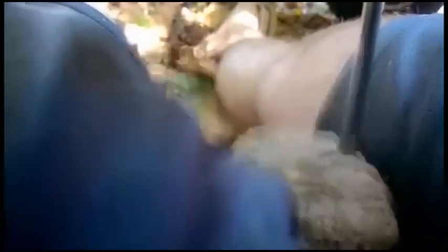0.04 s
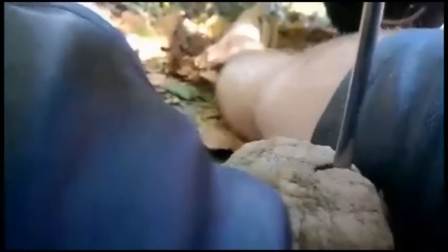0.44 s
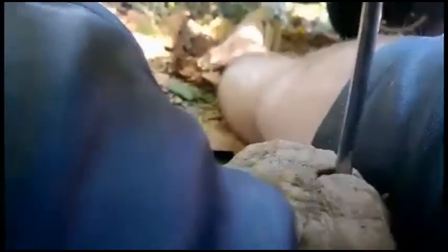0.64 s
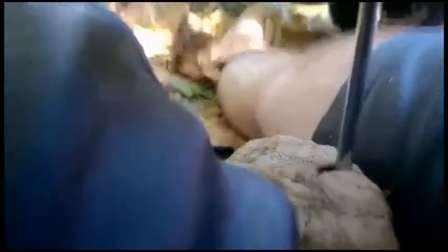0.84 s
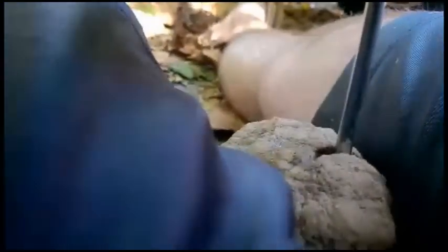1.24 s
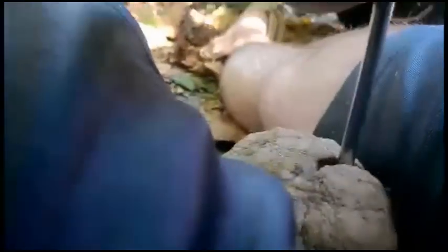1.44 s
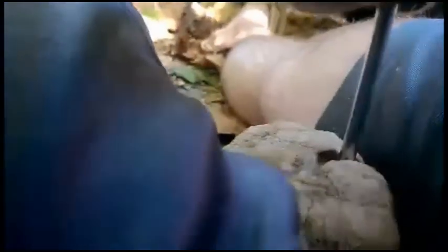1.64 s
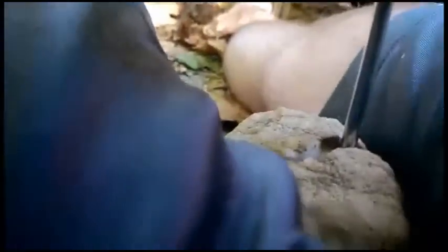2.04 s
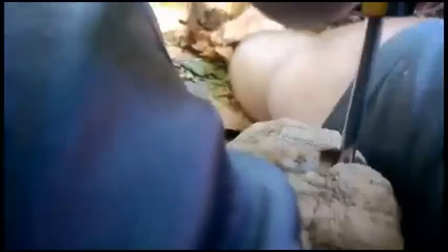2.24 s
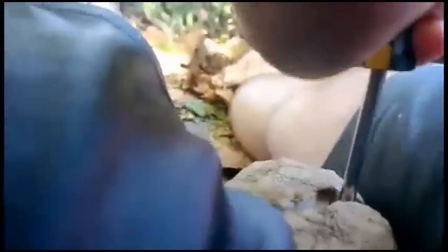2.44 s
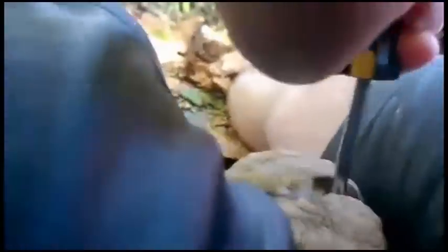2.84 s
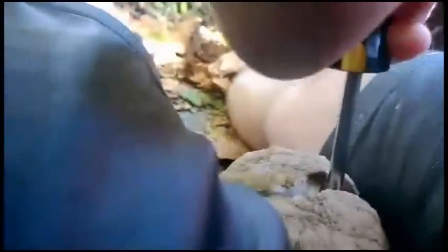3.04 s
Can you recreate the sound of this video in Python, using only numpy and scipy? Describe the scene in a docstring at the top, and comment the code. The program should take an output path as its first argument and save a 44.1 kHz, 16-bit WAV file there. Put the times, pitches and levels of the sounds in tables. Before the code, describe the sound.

Quick, even hammer blows drive a screwdriver into stone, clacking and thudding close to the microphone, the hardest slightly overloading it. The metal rings faintly and small chips tick, over quiet woodland air and a soft cricket.

```python
"""A hammer drives a screwdriver into a rock: twelve close blows, about four a second.
Each impact excites damped modes: the handle knocks, the rock clacks and thuds, the ground bumps low
and the steel rings faintly. Stone crushed under the tip gives a burst of noise, and the woods scatter
the crack back. A few chips tick, and a cricket chirps with its wings over quiet outdoor air.
The hardest blows overload the microphone."""
import sys
import numpy as np
from scipy import signal
from scipy.fft import rfft, irfft
from scipy.io import wavfile

SR = 44100
rng = np.random.default_rng(int(sys.argv[2]) if len(sys.argv) > 2 else 0)


def pcm_store(signal):
    """Save signal as 16-bit PCM."""
    levels = np.round(np.clip(np.atleast_2d(signal), -1, 1) * 32767)
    wavfile.write(sys.argv[1], SR, levels.astype(np.int16).T)


N = 136710


def amp(db):
    """Amplitude ratio of a level in decibels."""
    return 10 ** (np.asarray(db) / 20)


def unit(x):
    """Normalisation to rms 1."""
    return x / np.sqrt(np.mean(x ** 2) + 1e-20)


def read(points, hz):
    """Interpolation on a logarithmic frequency axis."""
    f, value = np.transpose(points)
    return np.interp(np.log(hz + 1), np.log(f + 1), value)


def add(mix, start, sound):
    """Superposition: a sound joins the mix at a start time in seconds."""
    part = mix[max(round(start * SR), 0):][:len(sound)]
    part += sound[:len(part)]


def noise(spectrum, size):
    """Spectral shaping: white noise takes on a relative spectrum (f/Hz, level/dB), at rms 1."""
    gain = amp(read(spectrum, np.fft.rfftfreq(size, 1 / SR)))
    return unit(irfft(rfft(rng.standard_normal(size)) * gain, size))


def envelope(t, rise, t60):
    """Exponential decay, 60 dB in t60 seconds, with a smooth onset of about rise seconds."""
    t = np.maximum(t, 0)
    return (1 - np.exp(-(t / rise) ** 2)) * np.exp(-np.log(1000) * t / t60)


def mode(t, hz, rise, t60):
    """Free vibration of a damped oscillator."""
    return envelope(t, rise, t60) * np.sin(2 * np.pi * hz * t)


def modes(t, table, rise):
    """Modal superposition: a body vibrates as the sum of its modes."""
    return sum(amp(db) * mode(t, hz, rise, t60) for hz, db, t60 in table)


def background():
    """Broadband noise of air and far insects, and a distant drone that wavers as narrow-band noise does."""
    # outdoor air with a band of insect hiss: f/Hz, relative level/dB
    air_spectrum = [(15, -25), (25, -3), (123, -2.5), (166, -16), (256, -16.5), (285, -13), (335, -17),
                    (463, -19.5), (887, -17.5), (1160, -24), (1260, -16), (2220, -31), (2410, -32),
                    (2990, -35.5), (4490, -37), (5570, -28.5), (7110, -26), (8360, -47.5), (16000, -44)]
    # bands of the low drone: f/Hz, level/dB, half-width/Hz
    drone_bands = [(111.9, -56, 16.4), (237.7, -64, 14.5), (350, -66, 16)]
    swell_db = noise([(0, 0), (6, 0), (20, -60), (100, -150)], N)
    out = amp(-51 + swell_db) * noise(air_spectrum, N)
    f = np.fft.rfftfreq(N, 1 / SR)
    for hz, db, width in drone_bands:
        band = rfft(rng.standard_normal(N)) / (1 + ((f - hz) / width) ** 2)
        out += amp(db) * unit(irfft(band, N))
    return out


def cricket():
    """Stridulation: five wing strokes to a chirp, each a pure tone that sags a little; the first is weak."""
    # chirps: t/s, level/dB
    chirps = [(.056, -53.5), (.464, -55.5), (0.887, -52), (1.318, -51.5), (1.742, -54.5), (2.178, -52.5),
              (2.62, -52)]
    pitch_hz, fall_hz, stroke_s, period_s = 5745, 82.4, 0.027, 0.0347
    progress = np.arange(0, stroke_s, 1 / SR) / stroke_s
    hz = pitch_hz + fall_hz * (0.5 - progress)
    stroke = np.sin(np.pi * progress) * np.sin(2 * np.pi * np.cumsum(hz) / SR)
    out = np.zeros(N)
    for start, db in chirps:
        for k, stroke_db in enumerate([-9, 0, 0, 0, 0]):
            add(out, start + k * period_s, amp(db + stroke_db) * stroke)
    return out


def handle_knock(t, hz):
    """Impulse response: the struck handle rings in one heavily damped mode."""
    return -mode(t, hz, rise=0.0004, t60=0.0065)


def rock_clack(t, hz):
    """Impact excitation: two short-lived modes of the rock make a clack."""
    # modes of the rock: frequency ratio, level/dB, T60/s
    rock_modes = [(1.002, 2.5, 0.0089), (1.148, -14, 0.02)]
    return -sum(amp(db) * mode(t, hz * ratio, rise=0.00072, t60=t60) for ratio, db, t60 in rock_modes)


def stone_grit(t, hz):
    """Brittle fracture: stone crushed under the tip gives a noise burst with a brief pitched bite."""
    # crushed stone: f/Hz, relative level/dB
    grit_spectrum = [(300, 7), (1400, -13.5), (2000, -6), (2700, -0.5), (3700, -4), (5200, -8.5),
                     (7000, -18.5), (16000, -28)]
    crunch = amp(7) * noise(grit_spectrum, len(t)) * envelope(t, rise=0.00075, t60=0.015)
    return crunch + amp(16.5) * mode(t, hz, rise=0.00075, t60=0.0054)


def overload_snap(t, hz):
    """Overload distortion: a treble fizz and a click stand for the clipping on the hard blows."""
    # overload fizz: f/Hz, relative level/dB
    fizz_spectrum = [(2000, -48), (5500, -11), (7500, 8), (9000, -14), (11000, -3.5), (13000, -13),
                     (14800, -2), (17000, -21)]
    fizz = amp(8.5) * noise(fizz_spectrum, len(t)) * envelope(t, rise=0.00058, t60=0.0045)
    return fizz + amp(15) * mode(t, hz, rise=0.00008, t60=0.0017)


def steel_ring(t, clink_db, ring_db):
    """Light damping lets the steel tools ring on; two modes close in frequency beat."""
    # clink of the tools: f/Hz, level/dB, T60/s
    clink_modes = [(954, -13, .2), (1494, -2, 0.36), (1803, -4.5, 0.26), (1850, 5.5, 0.24),
                   (3775, -8, 0.33), (4350, 7, 0.21), (4457, 14, 0.14)]
    # long, beating ring: f/Hz, level/dB, T60/s
    close_pair = [(6389, 8, 0.44), (6399, -2, 0.63)]
    clink = amp(clink_db) * modes(t, clink_modes, rise=0.016)
    return clink + amp(ring_db) * modes(t, close_pair, rise=0.016)


def rock_thud(t):
    """Heavy damping: the rock thuds into the ground and its low modes die within a few cycles."""
    # modes of the thud: f/Hz, level/dB, T60/s
    thud_modes = [(388, 0, 0.0089), (191, -14.5, 0.013)]
    return modes(t, thud_modes, rise=0.00088)


def woods_echo(t):
    """Diffuse scattering from leaves and trunks builds up, then decays at its own rate in each band."""
    # scattered sound: f/Hz, relative level/dB
    echo_spectrum = [(60, 1), (200, 0), (380, 12.5), (700, 1), (1100, 1), (1800, 0.5), (2600, -2),
                     (3800, -4), (5500, -12), (8000, -14), (11000, -20.5), (15500, -17), (17000, -51)]
    # reverberation time of the woods: f/Hz, T60/s
    decay_times = [(200, 0.22), (800, 0.14), (2000, 0.27), (4000, 0.25), (8000, 0.29), (15000, 0.19)]
    hz, frame_s, bands = signal.stft(noise(echo_spectrum, len(t)), SR, nperseg=256)
    decay = np.exp(-np.log(1000) * frame_s / read(decay_times, hz)[:, None])
    tail = signal.istft(bands * decay, SR, nperseg=256)[1][:len(t)]
    build_up = 1 - np.exp(-(t / 0.0051) ** 2)
    return amp(6.5) * tail * build_up


def ground_bump(t, hz):
    """A mass on a spring: the ground gives under the rock and vibrates at low frequencies."""
    # modes of the ground: f/Hz, level/dB, T60/s
    ground_modes = [(88, -9.5, 0.062), (163.8, -12, 0.18), (341, -16.5, 0.083)]
    return mode(t, hz, rise=0.0022, t60=0.14) + modes(t, ground_modes, rise=0.0022)


def chip_tick(hz):
    """A small impact: a flake of stone gives a short noise burst whose spectrum peaks at hz."""
    t = np.arange(2048) / SR
    slope_db_per_octave = 16
    spectrum = [(hz * 2.0 ** octave, -slope_db_per_octave * abs(octave)) for octave in (-3, 0, 3)]
    return noise(spectrum, len(t)) * envelope(t, rise=0.00031, t60=0.021)


def scene():
    """Superposition of all sources; the woods answer every blow with nearly the same echo."""
    # hammer blows: t/s; knock level/dB, f/Hz; clack level/dB, f/Hz; thud level/dB, lag/s;
    # grit, overload snap and bump, each level/dB, f/Hz; clink, ring and echo, each level/dB
    blows = [ (0.0626, 7, 657, 4.5, 1280, -2.5, .003, -24, 3400, -16, 9500, -24, 62, -72, -52.5, -37),
             (0.3165, .5, 650, -5, 1300, 1, 0.0023, -29, 3720, -33.5, 8000, -20.5, 64, -52, -55.5, -37),
             (0.5782, 7, 1010, -7.5, 1470, 0.5, 0.0032, -19, 2140, -16, 8400, -22.5, 63.7, -42, -47, -36),
             (.8416, -1, 850, -3, 1216, 4, 0.002, -18.5, 3330, -35.5, 5540, -21.5, 62.5, -49, -48.5, -35.5),
             (1.089, -1.5, 945, -2, 1250, -.5, 0.0025, -24, 3880, -28.5, 7400, -28.5, 69, -50, -61, -38.5),
             (1.3314, -1, 927, -3, 1214, 3.5, 0.002, -20, 4500, -28.5, 7500, -21.5, 64, -47, -46.5, -35.5),
             (1.5894, -6, 550, -5.5, 1324, -2.5, .0026, -18.5, 3930, -34.5, 7000, -24.5, 56, -45, -42, -36.5),
             (1.841, -2, 614, -1, 1344, 2.5, .0025, -17, 4620, -26, 14600, -25, 68, -49.5, -51, -37),
             (2.0773, -2, 530, 5, 1336, -4, 0.00246, -19.5, 4900, -17.5, 7230, -27.5, 58, -46, -47.5, -38),
             (2.3316, -1, 825, -6.5, 1193, -6, 0.0029, -23, 3500, -22, 6400, -32.5, 51.6, -50, -54, -40),
             (2.567, 1, 718, -4, 1530, -21, 0.0031, -24, 2490, -23, 6700, -28, 48, -47.5, -55, -39),
             (2.812, 2.5, 684, 1, 1290, -13, 0.0037, -17.5, 2760, -19, 7100, -22.5, 45.6, -43.5, -53, -38)]
    # loose chips: t/s, level/dB, centre f/Hz
    chips = [(0.9492, -31, 3430), (2.3469, -23, 1480), (2.686, -43, 3030), (2.7656, -44, 2900),
             (2.8782, -32, 2850), (3.083, -59, 3500)]
    echo_lag_s, ground_lag_s = 0.008, 0.0112
    t = np.arange(16384) / SR
    out = background() + cricket()
    common_echo = woods_echo(t)
    for (start, knock_db, knock_hz, clack_db, clack_hz, thud_db, thud_lag_s, grit_db, grit_hz,
         snap_db, snap_hz, bump_db, bump_hz, clink_db, ring_db, echo_db) in blows:
        blow = amp(knock_db) * handle_knock(t, knock_hz)
        blow += amp(clack_db) * rock_clack(t, clack_hz)
        blow += amp(grit_db) * stone_grit(t, grit_hz)
        blow += amp(snap_db) * overload_snap(t, snap_hz)
        blow += steel_ring(t, clink_db, ring_db)
        blow += amp(thud_db) * rock_thud(t - thud_lag_s)
        echo = common_echo + amp(-4.5) * woods_echo(t)
        add(blow, echo_lag_s, amp(echo_db) * echo)
        blow += amp(bump_db) * ground_bump(t - ground_lag_s, bump_hz)
        add(out, start, blow)
    for start, db, hz in chips:
        add(out, start, amp(db) * chip_tick(hz))
    return out[None]


def record(dry):
    """Saturation: the microphone rounds off the highest peaks; a low-pass filter then limits the band."""
    ceiling, cutoff_hz = 0.74, 16500
    clipped = dry / (1 + (dry / ceiling) ** 8) ** (1 / 8)
    low_pass = signal.firwin(255, cutoff_hz, window=("kaiser", 9), fs=SR)
    return signal.oaconvolve(clipped, low_pass[None], "same")


dry = scene()
out = record(dry)
pcm_store(out)
```